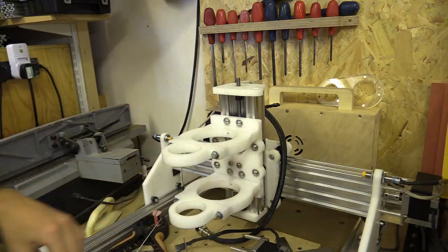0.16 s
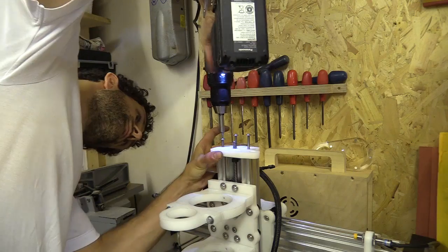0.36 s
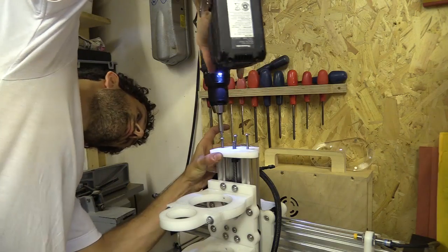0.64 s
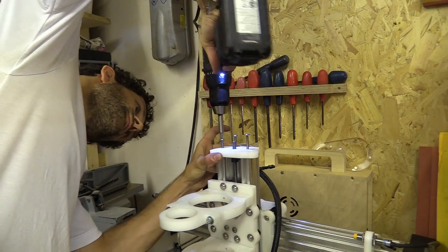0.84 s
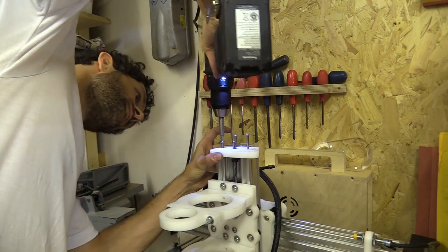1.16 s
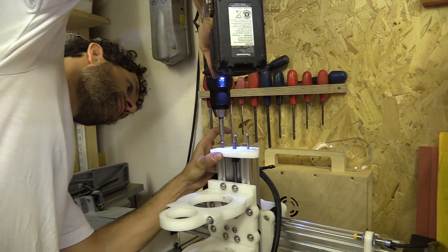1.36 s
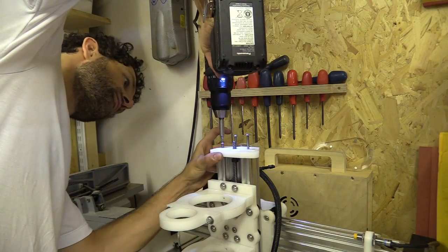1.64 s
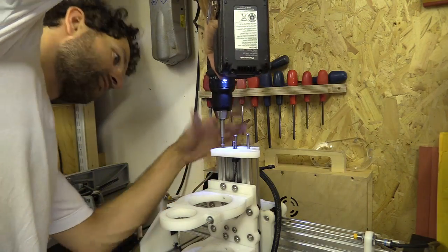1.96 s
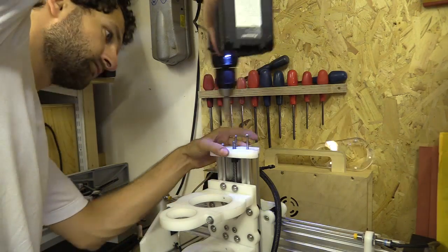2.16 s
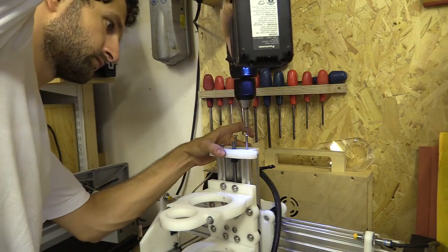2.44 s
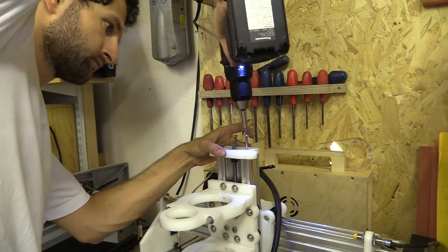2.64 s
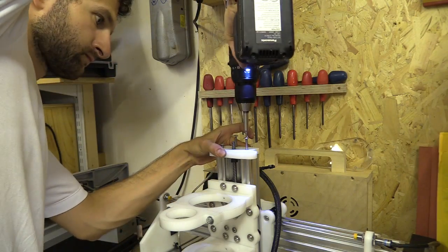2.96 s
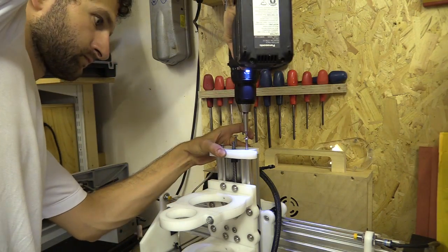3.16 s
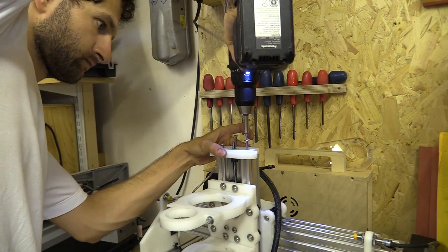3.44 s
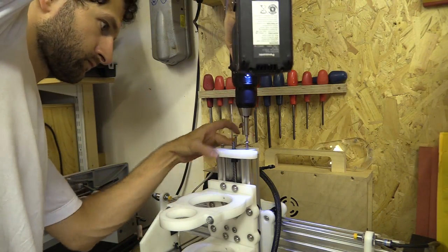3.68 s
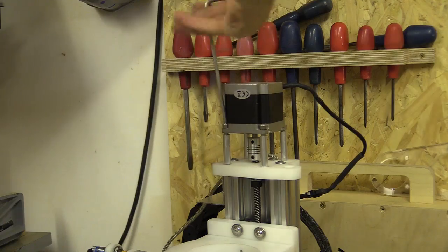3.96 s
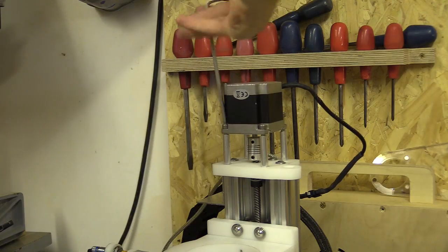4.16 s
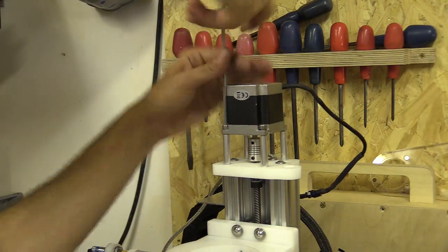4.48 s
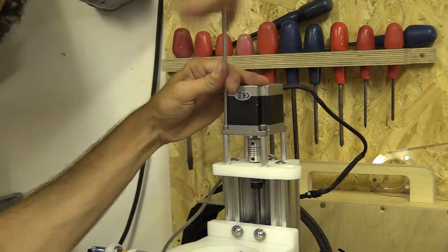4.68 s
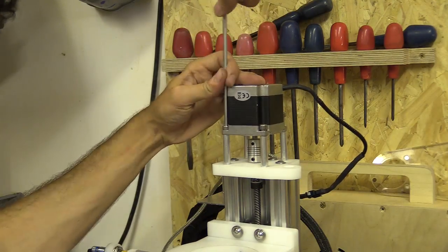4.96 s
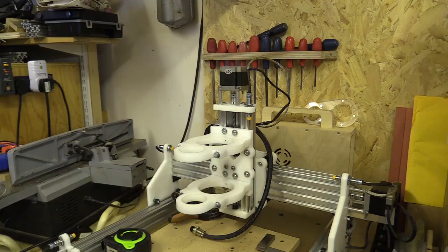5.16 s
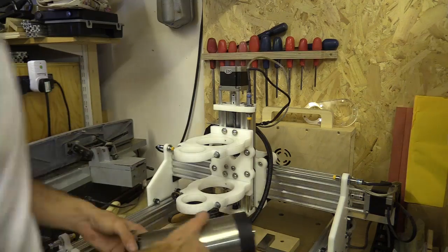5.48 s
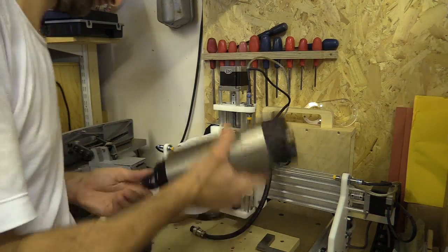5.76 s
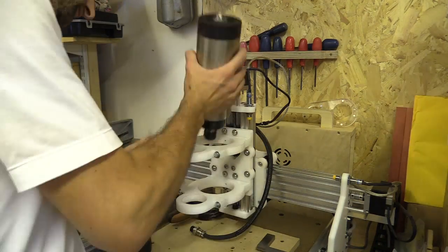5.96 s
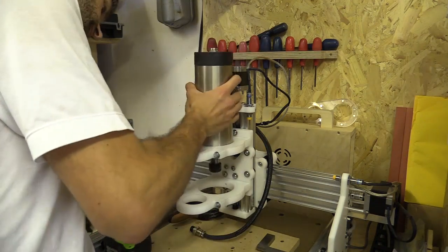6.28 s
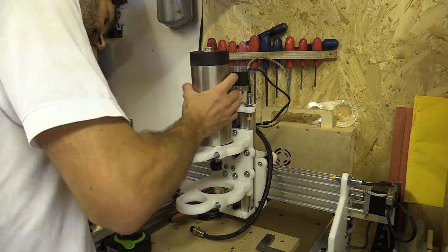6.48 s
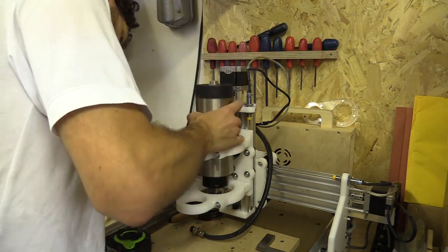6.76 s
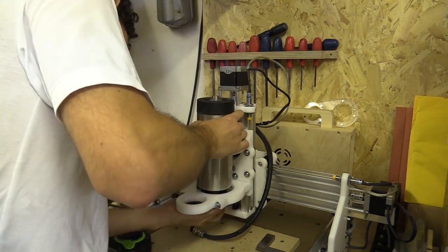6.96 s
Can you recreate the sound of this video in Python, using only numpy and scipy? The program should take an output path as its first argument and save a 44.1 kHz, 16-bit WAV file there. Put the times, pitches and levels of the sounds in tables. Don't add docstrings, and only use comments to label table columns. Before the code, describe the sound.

A power drill works screws in brief sharp bursts and two longer runs, its gears rasping and rattling, each pull braking abruptly. Bright metal clicks fall between them. Then come quieter key ticks, small scrapes and dull plastic knocks, and finally a run of heavier metallic clacks and low thuds as a spindle is seated. Dry, close mono sound with short room reflections, faint handling rustle and low building rumble.

```python
import sys
import numpy as np
from scipy import signal
from scipy.fft import rfft, irfft, next_fast_len
from scipy.io import wavfile
from scipy.ndimage import uniform_filter1d

SR = 44100
rng = np.random.default_rng(int(sys.argv[2]) if len(sys.argv) > 2 else 0)


def transcribe(signal):
    frames = np.atleast_2d(signal).T
    limited = np.clip(frames, -1, 1)
    pcm = np.round(limited * 32767).astype(np.int16)
    wavfile.write(sys.argv[1], SR, pcm)


def volts(x):
    e = np.asarray(x, float) / 20
    return 10 ** e


N = 313992


def unit(x):
    return x / np.sqrt(np.mean(x ** 2) + 1e-20)


def along(points, hz):
    f, v = np.transpose(points)
    return np.interp(np.log(hz + 1), np.log(f + 1), v)


def curves(rows, outside=None):
    s, *cols = np.transpose(rows)
    return [np.interp(np.arange(N) / SR, s, c, outside, outside) for c in cols]


def wobble(rate):
    knots = rng.standard_normal(int(N * rate / SR) + 4)
    return np.interp(np.arange(N) * rate / SR, np.arange(len(knots)), knots)


def filtered(x, response):
    m = next_fast_len(len(x) + 8192)
    return irfft(rfft(x, m) * response(np.fft.rfftfreq(m, 1 / SR)), m)[:len(x)]


def noise(spectrum):
    return unit(filtered(rng.standard_normal(N), lambda hz: volts(along(spectrum, hz))))


def resonances(modes):
    def response(f):
        total = 0
        for k, (c, width, db) in enumerate(modes):
            total = total + (-1) ** k * volts(db) * 1j * f * width / (c * c - f * f + 1j * f * width)
        return total
    return response


# time_s, speed_hz
SLOW_RUN = [
    (1.26, 169),
    (1.31, 167),
    (1.42, 179.5),
    (1.455, 179),
    (1.49, 186),
    (1.6, 187.6),
    (1.63, 192),
    (1.82, 190.6),
    (2.11, 194.5),
]
# time_s, speed_hz
FAST_RUN = [
    (3.0, 165),
    (3.15, 186),
    (3.172, 226),
    (3.25, 273),
    (3.278, 372),
    (3.335, 437),
    (3.415, 504),
    (3.51, 550),
    (3.72, 577),
]
# start_s, brake_s, top_speed_hz, gear_noise_db, low_rattle_db
PULLS = [
    (0.557, .645, 528, -22.5, -36),
    (0.806, 0.871, 510, -23.5, -32.5),
    (0.957, 1.015, 492.2, -22.5, -37.5),
    (1.099, 1.166, 507.6, -23, -34),
    (2.641, 2.785, 190, -33, -38.5),
    (2.802, 2.912, 534.2, -22.5, -52.5),
]
FULL_PULLS = [row for row in PULLS if row[2] > 300]


def motor_speed():
    spin_s, spin_bend = 0.025, 2.4
    brake_s, ease_s = 0.041, 0.013
    t = np.arange(N) / SR
    speeds = np.array([curves(SLOW_RUN, 0)[0], curves(FAST_RUN, 0)[0], np.zeros(N)])
    for start, brake, top_hz, *_ in PULLS:
        row = 2 if top_hz > 300 else 0
        rise = 1 - np.exp(-(np.clip(t - start, 0, 1) / spin_s) ** (spin_bend if row else 1))
        fall = 1 - np.clip((t - brake + ease_s) / brake_s, 0, 1) ** 2.2
        speeds[row] += top_hz * rise * fall
    return speeds


COAST_S = 0.013
# start_s, brake_s, gear_noise_db, low_rattle_db
RUNS = [
    (1.257, 2.075, -29.5, -32.5),
    (3.006, 3.679, -28.5, -32),
]


def effort(hz):
    attack_s, attack_db = 0.011, 21
    kick_db, kick_s = 5.5, 0.048
    squeeze_db, squeeze_s = 5.5, 0.15
    bite_db, bite_s, fall_db_per_s = 4, 0.0035, 744.5
    gear_db_per_oct, rattle_db_per_oct = 5.5, -0.5
    easy_hz, full_hz = 190, 441
    t, gear, low = np.arange(N) / SR, np.zeros(N), np.zeros(N)
    octaves = np.log2(np.clip(hz, 100, full_hz) / easy_hz)
    for rows, long in ((PULLS, False), (RUNS, True)):
        for start, brake, *_, gear_db, rattle_db in rows:
            age, after = np.clip(t - start, 0, None), t - brake - COAST_S
            db = -attack_db * np.clip(1 - age / attack_s, 0, 1) - fall_db_per_s * np.clip(after, 0, None)
            db += bite_db * (1 - 0.44 * long) * np.exp(-(after / bite_s) ** 2)
            db += -squeeze_db * np.exp(-age / squeeze_s) if long else kick_db * np.exp(-age / kick_s)
            gear += (t > start) * volts(gear_db + db + long * gear_db_per_oct * octaves)
            low += (t > start) * volts(rattle_db + db + long * rattle_db_per_oct * octaves)
    return gear, low


MULTIPLES = [1.525, 3, 4, 5.055, 6, 7, 8, 9.75, 10, 12.85, 14, 16, 18.7, 20, 22, 22.6, 24.55, 32, 34, 44,
             46, 48, 50, 36, 38, 40]
# slow_burst_db, fast_burst_db, short_pull_db
ORDERS_DB = [(-20, 8.5, -1), (-1.5, -7, -31.5), (-26, -9.5, -29.5), (2, 0, -20), (4.5, 4, -14),
             (-11.5, -16, -22), (-15, -4.5, -26), (-11.5, 1, -29.5), (-10, -7.5, -23.5), (-32, -37, -9),
             (-5, -1.5, -22), (-4.5, -4.5, -6.5), (-5.5, -27.5, -38), (-9, -2.5, -18.5), (-20, -6.5, -18),
             (-25.5, -44, -13), (-10.5, -3, -21.5), (-31.5, -3, -6.5), (-9.5, -6, -28.5), (-12.5, -10, -14),
             (-23.5, -4.5, -30), (-23.5, -4.5, -20.5), (-17, -11.5, -23.5), (-23, -8, -24.5),
             (-26, -5, -25), (-25, -8, -25.5)]
PATCHY_DB = (3.5, 2.5, 3)
# time_s, commutator_line_db
LOAD = [
    (1.27, -7),
    (1.35, 5.5),
    (1.45, 2.5),
    (1.475, -5),
    (1.56, 5.5),
    (1.62, -2),
    (1.69, 3),
    (1.825, 2),
    (1.87, -3),
]


def shaft_lines(speeds, turns):
    hz, kind = speeds.max(axis=0), speeds.argmax(axis=0)
    t, lines, on = np.arange(N) / SR, np.zeros(N), hz > 0
    patchy, load = np.take(PATCHY_DB, kind[on]), curves(LOAD, 0)[0][on]
    change = np.gradient(speeds[2]) * SR
    braking_db = 14 * np.clip(-change[on] / 15000, 0, 1)
    torque_db = 12.5 * np.clip(np.abs(change[on]) / 12000, 0, 1)
    for k, levels in zip(MULTIPLES, ORDERS_DB):
        db = np.take(levels, kind[on]) + patchy * wobble(70 if k > 11 else 35)[on]
        db += torque_db + load if k == 6 else -braking_db
        lines[on] += volts(db) * (k * hz[on] < SR / 2.7) * np.sin(2 * np.pi * k * turns[on])
    lines *= np.clip(hz / 60, 0, 1) * (1 + 0.55 * np.exp(-hz / 350) * wobble(160))
    lines *= np.where(kind == 1, volts(2.0 - 8.44 * (1.5 - hz / 570)), 1)
    surge = 1 + np.clip(np.abs(change) / 12000, 0, 1)
    lines *= np.where(kind == 2, surge ** 0.6 * volts(-8 * np.clip(1 - hz / 300, 0, 1)), 1)
    lines *= volts(10.5 * sum(np.exp(-((t - row[1] + 0.0049) / 0.0084) ** 2) for row in FULL_PULLS))
    late = sum(np.clip(t - row[1] - COAST_S, 0, 0.1) * (t < row[1] + 0.2) for row in RUNS)
    return lines * volts(-500 * late)


# pitch_hz, width_hz, level_db
SQUEAL = [(8490, 540, 0)]


def climb_ring(speeds):
    t = np.arange(N) / SR
    gain = np.gradient(uniform_filter1d(speeds[:2].max(axis=0), size=900, origin=440)) * SR
    climbing = np.clip((gain - 1000) / 9000, 0, 1) ** 0.54
    early = sum(np.exp(-((t - row[0] - 0.013) / 0.017) ** 2) for row in FULL_PULLS)
    return unit(filtered(rng.standard_normal(N), resonances(SQUEAL))) * (climbing + 0.96 * early)


# pitch_hz, width_hz, level_db
HOUSING = [(255.8, 14, 6.5), (549, 51, 0), (927, 129, 3.5), (1050, 92, 9), (1891, 124, 15.5),
           (2876, 100, 10), (3920, 520, 10.5), (4750, 640, 12), (8600, 790, 19.5), (11800, 1100, 8.5),
           (13270, 850, 10.5)]
# pitch_hz, level_db (per Hz)
GEARS = [(1350, -17), (2300, 0.5), (4710, 9), (7290, -2.5), (8250, 1), (12600, 6), (15700, -1.5),
         (16100, -8.5), (16500, -48)]
# pitch_hz, level_db (per Hz)
RATTLE = [(120, -61), (200, -49), (289, -3), (422, -33.5), (573, -9.5), (740, -20.5), (975, -3), (1170, -8),
          (1350, -21.5), (1870, -6.5), (2300, -22), (2990, -69.5), (5060, -120)]


def drill():
    speeds = motor_speed()
    hz = speeds.max(axis=0)
    gear, low = effort(hz)
    turns = np.cumsum(hz + 1.476 * wobble(90) * (hz > 0)) / SR
    lines = shaft_lines(speeds, turns)
    surge = 1 + np.clip(np.abs(np.gradient(speeds[2])) * SR / 12000, 0, 1)
    brushes = surge * noise([(100, 1.5), (16000, -18.0)])
    ring = resonances(HOUSING)

    def shell(f):
        return (0.3 + ring(f)) * f / (f - 1j * 220)

    whine = filtered(volts(-15.0) * gear * lines + volts(-19.0) * gear * brushes, shell)
    mesh = noise(GEARS) * (1 + 0.41 * np.sin(2 * np.pi * turns)) * volts(0.71 * wobble(90))
    rattle = noise(RATTLE) * volts(2.7 * wobble(70))
    return whine + gear * climb_ring(speeds) + volts(-4.5) * gear * mesh + volts(-5.0) * low * rattle


# start_s, peak_db, weight_db, ring_hz
BIT = [(0.2681, -18, -9.5, 8600), (0.2802, -21, -11, 3920), (0.296, -23, -17, 6330),
       (0.3995, -35, -4.5, 2380), (0.4201, -30, -7, 4480), (0.4695, -35, -9, 4500), (.3755, -45, -15, 5360),
       (.435, -48, -16, 9000), (.519, -30, -15, 7000), (.529, -27, -11, 5000), (0.5008, -15.5, -26, 4980),
       (.5092, -11, -21.5, 7180), (.5098, -3, -66, 9060), (.7624, -6.5, -62, 9900),
       (0.587, -34.5, 20.5, 3980), (0.7455, -18, -21, 5360), (0.7629, -11.5, -42, 9770),
       (.84, -41, 18, 4000), (.865, -42, 17.5, 4000), (2.0932, -11.5, -27, 11950),
       (2.1099, -20, -3.5, 3555), (2.393, -29, -22, 8000), (2.3975, -15, -5.5, 2860),
       (2.469, -33.5, -13, 6000), (2.481, -35, -8, 5550), (2.5453, -24, 6, 2660), (2.558, -36, -13, 5000),
       (2.608, -36, -6, 5930), (2.6025, -29, -7, 3314), (2.6428, -15.5, -12, 8600),
       (2.6634, -15, 1.5, 4930), (2.6821, -11.5, -5.5, 3100), (3.491, -27.5, -1, 5205),
       (3.812, -32.5, 3, 2936), (3.916, -28, -3, 4540)]
# start_s, peak_db, weight_db, ring_hz
KEY = [(4.4386, -15, -38, 13400), (4.438, -22.5, 1, 6800), (4.627, -23, -11, 3240),
       (4.804, -39, 12.5, 3580), (4.885, -26.5, -2, 11800), (5.1465, -35, -2.5, 6260),
       (5.226, -35, 9, 3500), (4.5515, -39, -10, 6670), (4.7415, -39, -15, 11000), (4.757, -38, -5, 4500),
       (4.8, -40, -10, 6000), (4.94, -43, -4, 7000), (5.06, -47, -3, 5930), (5.079, -45, 4, 4890),
       (5.092, -46, 3, 6000), (5.507, -40, -20, 6000), (5.74, -46, -15, 6000), (5.987, -41, -14, 5000),
       (4.117, -47, 7, 4500), (4.45, -23.5, -8, 8900), (5.4326, -21.5, -3.5, 6500), (5.917, -41, -22, 5000)]
# start_s, peak_db, weight_db, ring_hz
SPINDLE = [(6.049, -28.5, 1, 2790), (6.054, -23.5, -5, 5000), (6.077, -34, 1.5, 5360),
           (6.139, -20, 1.5, 11800), (6.1982, -17.5, 1, 4360), (6.2638, -19.5, 10.5, 2280),
           (6.2895, -12.5, 2, 4220), (6.387, -37, 9.5, 1990), (6.273, -19, -12, 9100),
           (6.303, -23, -8, 9200), (6.314, -28, -9, 6000), (6.3446, -34, -13, 12000), (6.474, -40, 3, 5000),
           (6.495, -43, -5, 5000), (6.683, -31, 0, 6000), (6.829, -40, -5, 9000), (7.0006, -48, -5, 3420),
           (7.008, -35, -3, 4240), (6.135, -34, 0, 9050), (6.205, -22.5, -8, 9000), (6.235, -34, -4, 9000),
           (6.44, -30, -13, 6060), (6.56, -53, 19, 3470), (6.606, -10.5, -0.5, 6020),
           (6.656, -25, -5, 6000), (7.112, -41, -5, 5000), (6.619, -19.5, 1, 1850),
           (6.6367, -11.5, -2.5, 2530), (6.758, -44, -20, 8500), (6.774, -33, -22, 8600),
           (6.8197, -25.5, -6, 9000), (7.0188, -23.5, 11, 11800), (7.0537, -27.5, -4, 8000)]
# start_s, peak_db, weight_db, ring_hz
SCRAPES = [(0.061, -33, -8, 4750), (2.467, -43, -8, 4970), (4.0821, -45, 0.5, 4770),
           (4.1288, -46.5, 6.5, 4560), (4.184, -45.5, 6.5, 4130), (4.2228, -38, 1, 4700),
           (4.274, -50, 3, 4600), (4.3905, -42.5, -6, 9100), (4.458, -35, 2, 4650), (4.506, -40, 3, 2760),
           (4.577, -36, 4, 6600), (4.6952, -36.5, 1, 3700), (4.8414, -27, -0.5, 4590),
           (4.9165, -38.5, -5, 2440), (4.712, -48, 0, 4420), (5.328, -42.5, -17, 2290),
           (5.4419, -18, -20, 6060), (5.6171, -43.5, -19, 2090), (5.6925, -40, -7.5, 4190),
           (6.3114, -35.5, -26, 2040), (6.4784, -47.5, 18, 1970), (6.702, -30, -3.5, 5330),
           (6.723, -27, -3.5, 4420), (6.712, -35, -15, 10000), (6.733, -37, -13, 10000),
           (6.84, -40, -2, 7960), (6.863, -40.5, -4, 9000), (.2, -48, -8, 7000), (.235, -42, -12, 8950),
           (6.9206, -41.5, -2, 7060)]
# start_s, peak_db, weight_db, ring_hz
SLIDES = [
    (5.25, -42, -10, 3580),
    (5.5, -54, -25, 13000),
    (6.33, -55, 6, 4130),
    (6.49, -62.5, 22.5, 1400),
    (6.74, -60, 10, 4000),
    (6.82, -43.5, -1.5, 3220),
    (6.93, -69, 0, 3080),
]
# pitch_hz, level_db (per Hz)
TICK = [(880, -24), (1500, -6.5), (3280, 3), (7250, -2), (9690, -3), (10600, -2), (15200, -10.5),
        (16800, -21)]
# pitch_hz, width_hz, level_db
PLATES = [(668, 110, -2), (843, 47, 2), (1030, 280, -2), (1343, 474, 0.5), (1560, 790, -4.5)]
# pitch_hz, width_hz, level_db
FRAME = [(147.8, 19.5, 2.5), (260, 64, 9.5), (307.5, 163, 2.5), (450, 60, 2.5), (583, 34, 0)]


def clatter():
    bright, clack, thud = np.zeros((3, N + 8192))
    t, push = np.arange(8192) / SR, rng.standard_normal((2, N + 8192))
    whole = np.resize(noise(TICK), N + 8192)
    treble = filtered(whole, lambda hz: 1 / (1 + (6500 / (hz + 1)) ** 3.3))
    rough = np.resize(wobble(1500), N + 8192)
    clicks = [(start - 0.0052, -29, -25.5, 8600) for start, *_ in PULLS + RUNS]
    for rows, swell_s in ((BIT + KEY + SPINDLE + clicks, 0), (SCRAPES, 0.005), (SLIDES, 0.018)):
        for s, db, weight_db, ring_hz in rows:
            at = slice(round(s * SR), round(s * SR) + 8192)
            tilt = np.log2(ring_hz / 5000)
            tick = (whole[at] - treble[at]) * volts(-6 * max(tilt, 0)) + volts(5.5 * tilt) * treble[at]
            life_s = 0.16 * volts(0.4942 * db + 0.3 * weight_db)

            def fade(share):
                if not swell_s:
                    return (1 - np.exp(-t / 0.00023)) * volts(-60 * t / (share * life_s))
                age = t / swell_s
                return (age * np.exp(1 - age)) ** 0.44 * volts(0.18 * rough[at])

            if swell_s:
                swell_s = np.clip(swell_s, 0.003, 0.035)
            else:
                crack = volts(-60 * t / 0.0021) * tick
                bright[at] += volts(db - 4.0) * crack / np.abs(crack).max()
            ring = np.sin(2 * np.pi * ring_hz * t) * rough[at]
            bright[at] += volts(db - 13.5) * fade(0.96) * (tick + volts(4) * ring)
            clack[at] += volts(db + weight_db + 6) * fade(1.0) * push[0, at]
            thud[at] += volts(db + weight_db + 9.0) * fade(0.99) * push[1, at]
    return bright[:N] + filtered(clack[:N], resonances(PLATES)) + filtered(thud[:N], resonances(FRAME))


# start_s, level_db, pitch_hz, t60_s
KNOCKS = [(.585, -24, 260, 0.076), (0.587, -9, 1004, 0.024), (2.397, -30, 577, 0.043),
          (2.397, -22.5, 1000, 0.054), (2.399, -29, 2650, 0.067), (2.399, -30, 3160, .06),
          (2.4, -28.5, 190, 0.085), (2.559, -36, 2860, 0.068), (6.27, -24, 458, .1),
          (3.497, -27, 240, 0.13), (4.138, -40, 458, 0.14), (4.192, -35, 472, 0.11), (4.233, -44, 503, .08),
          (4.444, -34, 987, 0.11), (4.455, -33.5, 574, 0.14), (4.511, -36.5, 476, 0.2),
          (4.513, -38, 1125, 0.079), (4.584, -38, 1194, 0.05), (4.59, -31, 384, 0.056),
          (4.705, -37, 576, 0.12), (4.712, -34, 1170, 0.053), (4.85, -29, 1170, .06),
          (4.852, -35, 274, 0.17), (5.145, -30, 1120, 0.015), (3.815, -29, 250, 0.072),
          (5.695, -42.5, 1550, 0.046), (2.77, -22, 910, 0.036), (.512, -32.5, 1013, 0.042),
          (5.227, -28, 450, 0.046), (6.479, -35, 1333, 0.084), (6.56, -33.5, 294, 0.28),
          (6.055, -27, 595, .1), (6.268, -20, 220, 0.14), (6.292, -14.5, 217, 0.064),
          (6.293, -25, 1063, 0.091), (6.619, -18.5, 167, 0.16), (6.618, -8.5, 1430, 0.021),
          (6.637, -20.5, 575, 0.12), (6.644, -22.5, 243, 0.17), (6.68, -26, 895, 0.047),
          (6.745, -34, 1280, 0.059), (6.746, -29.5, 254, 0.24), (6.83, -48, 1280, 0.043),
          (6.828, -34, 257, 0.21), (6.862, -43, 1390, 0.14), (6.924, -30.5, 298, 0.096),
          (7.02, -22, 597, 0.083)]


def knocks():
    out, t = np.zeros(N + 8192), np.arange(8192) / SR
    drift = np.resize(wobble(120), N + 8192)
    for s, db, hz, t60 in KNOCKS:
        at = slice(round(s * SR), round(s * SR) + 8192)
        tone = np.sin(2 * np.pi * hz * t + 1.18 * drift[at])
        out[at] += volts(db - 60 * t / t60) * (1 - np.exp(-t / 0.002)) * tone
    return out[:N]


# time_s, pressure_db
SINK = [
    (6.64, -44),
    (6.73, -48),
    (6.78, -56),
    (6.84, -42),
    (6.88, -38),
    (6.91, -49),
    (6.95, -54),
    (6.99, -56),
    (7.015, -40),
]
# pitch_hz, width_hz, level_db
SLEEVE = [(1280, 73, -8), (2120, 83, -16), (2600, 35, -9), (3040, 150, -6), (3650, 130, -8), (4200, 140, 5),
          (5170, 48, -3)]


def sleeve():
    grains = (rng.random(N) < 1800 / SR) * rng.standard_normal(N) * volts(3 * wobble(60))
    return volts(curves(SINK, -200)[0] - 11) * unit(filtered(grains, resonances(SLEEVE)))


# start_s, level_db
SHOVES = [(.29, -29), (1.351, -36), (2.131, -39), (2.41, -32), (2.68, -22.5), (3.49, -28.5), (4.44, -29),
          (4.861, -23), (5.239, -28), (5.458, -21), (6.2, -18), (6.27, -20), (6.622, -15.5), (7.03, -23)]
# pitch_hz, width_hz, level_db
BENCH = [(57.9, 9.2, -0.8), (117, 29, -1.7)]


def bench():
    shove_s, brake_shove_db = 0.0046, -26.5
    shoves, t = np.zeros(N), np.arange(2048) / SR
    for s, db in SHOVES + [(row[1], brake_shove_db) for row in FULL_PULLS]:
        shoves[round(s * SR)] += volts(db)
    push = signal.fftconvolve(shoves, t / shove_s * np.exp(1 - t / shove_s))[:N]
    rock = resonances(BENCH)
    return filtered(push, lambda hz: rock(hz) ** 2)


# time_s, level_db
HANDLING = [(0.0, -51.5), (.358, -62), (.7, -59), (2.14, -53), (2.484, -59), (2.63, -62), (3.74, -53.5),
            (4.21, -60), (4.75, -52), (5.01, -57.5), (5.21, -61.5), (5.24, -52), (5.52, -59), (6.03, -66.5),
            (6.26, -47.5), (6.59, -59.5), (6.76, -47.5), (7.12, -58.5)]
# pitch_hz, level_db (per Hz)
RUB = [(760, -21), (1300, -11), (2480, -11), (3200, -12), (4690, -9), (7500, -19), (9750, -60.5),
       (16500, -120)]
HISS = [(6000, -27.5), (7500, -6.5), (16000, -8), (17000, -31)]
BODY = [(53, -62), (90, -7), (259, -1.5), (316, 0), (460, 0), (706, -7), (765, -18.5), (973, -7),
        (2200, -31), (2860, -64), (4840, -120)]
RUMBLE = [(13, -61), (24, -26.5), (48, -6.5), (65, 11.5), (91, 3), (120, 7), (160, -40), (260, -120)]
# pitch_hz, width_hz, level_db
GRIT = [(1100, 700, 1.5), (2510, 830, 0.5), (4600, 1100, -4.5)]


def handling():
    body_db, = curves(HANDLING)
    rub_db = -63 + 0.77 * (body_db + 56.5)
    grip = wobble(25)
    rub = volts(rub_db + 1.8 * grip + 3.3 * wobble(140)) * noise(RUB)
    hiss = volts(rub_db - 5.5 + 2.1 * grip) * noise(HISS)
    body = volts(body_db + 3.1 * grip + 0.67 * wobble(32)) * noise(BODY)
    taps = (rng.random(N) < 150 / SR) * volts(3.5 * rng.exponential(size=N))
    chatter = volts(body_db - 14.5) * unit(filtered(taps, resonances(PLATES)))
    grains = (rng.random(N) < 600 / SR) * rng.standard_normal(N) * volts(3.7 * wobble(30))
    grit = volts(body_db - 18.5) * unit(filtered(grains, resonances(GRIT)))
    return rub + hiss + body + chatter + grit + volts(-66.5) * noise(RUMBLE)


# pitch_hz, t60_s
WALLS = [(200, 0.33), (700, 0.19), (2000, 0.072), (12000, 0.11)]


def room(x):
    hz, t, z = signal.stft(rng.standard_normal(SR // 4), SR, nperseg=256)
    tail = signal.istft(z * volts(-60 * t / along(WALLS, hz)[:, None]), SR, nperseg=256)[1]
    delayed = np.pad(x, (150, 0))
    return signal.fftconvolve(delayed, tail / np.linalg.norm(tail))[:N]


def scene():
    tool, parts = drill(), clatter() + bench()
    mono = tool + parts + knocks() + sleeve() + handling()
    mono = mono + volts(-12.5) * room(tool) + volts(-13.5) * room(parts)
    return np.array([mono, mono])


def top_cut(x):
    return signal.sosfilt(signal.butter(12, 17010, fs=SR, output="sos"), x)


# pitch_hz, level_db
TOP = [(15700, 0), (16000, -18), (16600, -24), (16900, -60), (17200, -90)]


def record(dry):
    dull = np.tile(filtered(dry[0], lambda hz: volts(along(TOP, hz))), (2, 1))
    return top_cut(dull)


dry = scene()
out = record(dry)
transcribe(out)
```